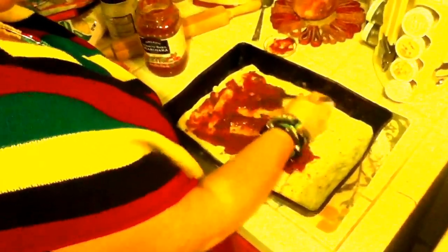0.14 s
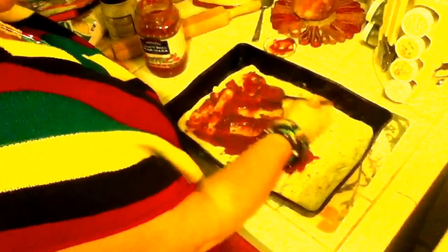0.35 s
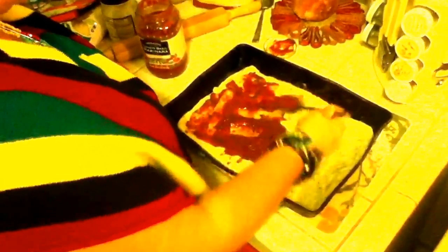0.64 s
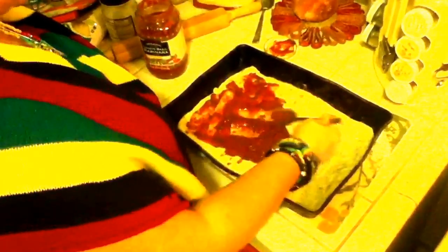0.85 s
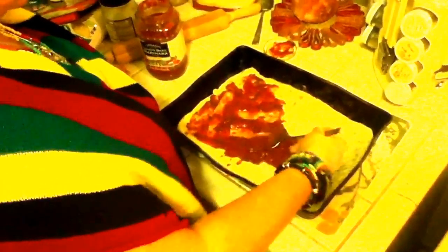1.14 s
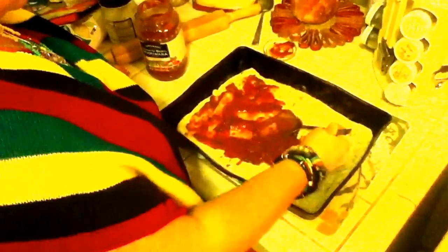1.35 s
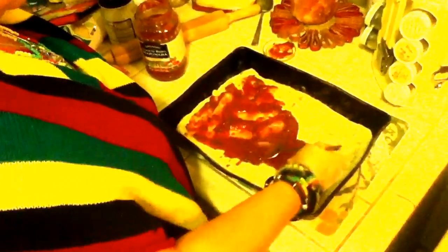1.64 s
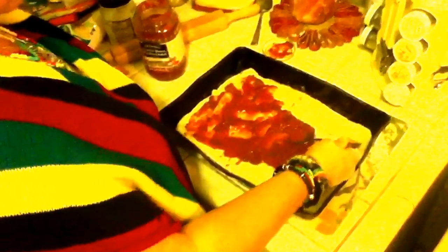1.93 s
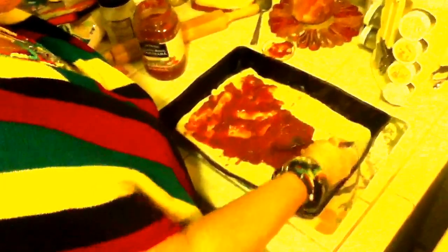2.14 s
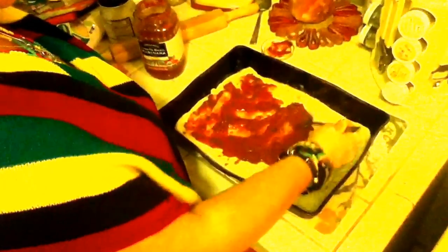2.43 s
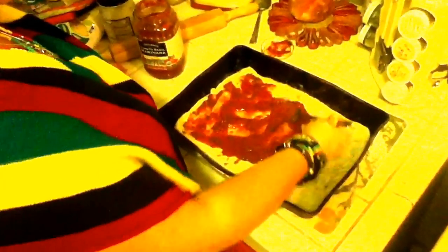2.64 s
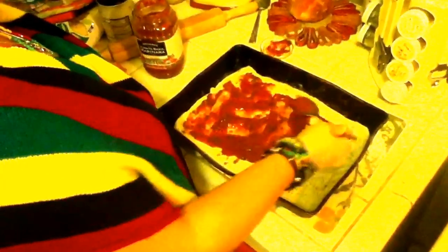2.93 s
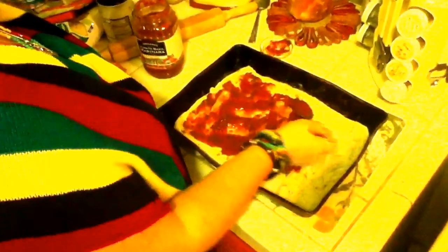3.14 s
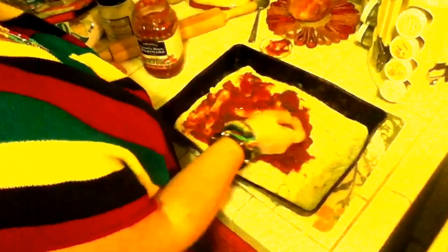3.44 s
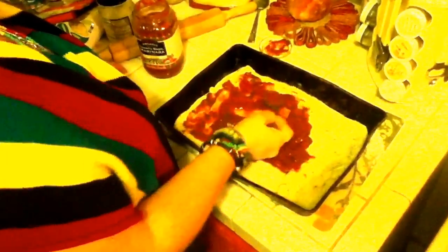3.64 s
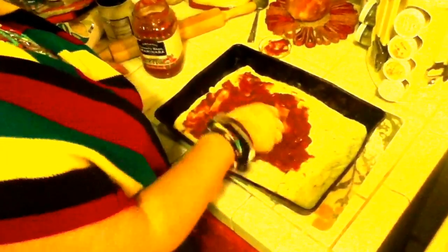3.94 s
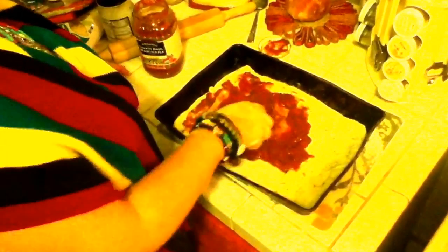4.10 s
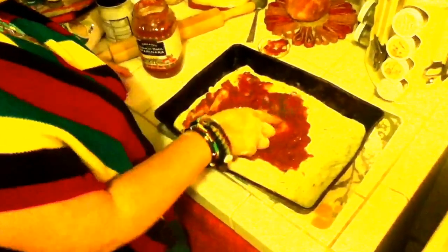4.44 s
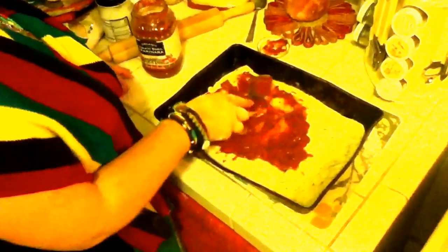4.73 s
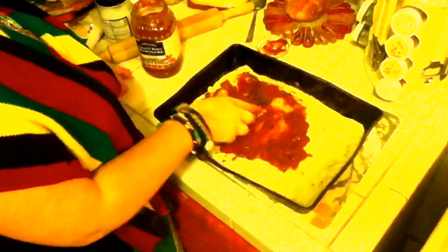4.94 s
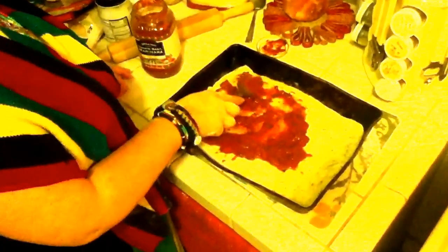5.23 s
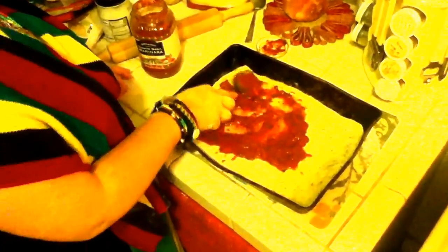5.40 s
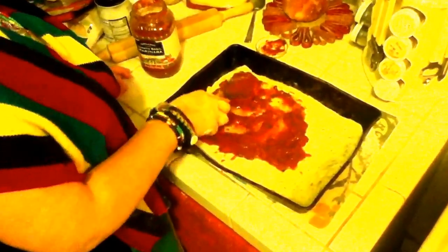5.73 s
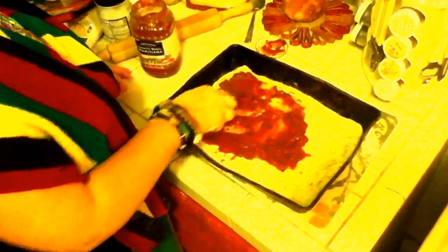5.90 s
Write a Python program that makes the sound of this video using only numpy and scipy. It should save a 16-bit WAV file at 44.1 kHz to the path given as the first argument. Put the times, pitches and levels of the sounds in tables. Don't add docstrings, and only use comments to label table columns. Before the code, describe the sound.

A thin baking pan moves on rough tile, heard close in a small reflective kitchen. It barely scrapes at first, beads clicking lightly, then lands hard several times, ringing and rattling for about half a second. Only hiss and low refrigerator hum follow. Later it is pushed with soft thuds and a short drag, knocked again more weakly, and ends with short swelling scrapes and light knocks as the hum drops away.

```python
import sys
import numpy as np
from scipy import signal
from scipy.fft import rfft, irfft, next_fast_len
from scipy.io import wavfile
from scipy.ndimage import map_coordinates

SR = 44100
rng = np.random.default_rng(int(sys.argv[2]) if len(sys.argv) > 2 else 0)


def convert_level_to_amplitude(level_db):
    exponent = np.asarray(level_db, float) / 20
    return 10 ** exponent


def transcribe(signal):
    frames = np.atleast_2d(signal).T
    limited = np.clip(frames, -1, 1)
    pcm = np.round(limited * 32767).astype(np.int16)
    wavfile.write(sys.argv[1], SR, pcm)


N = 267246
SPAN = SR * 2 // 5


def unit(x):
    return x / np.sqrt(np.mean(x ** 2) + 1e-20)


def along(points, hz):
    f, v = np.transpose(points)
    return np.interp(np.log(hz + 1), np.log(f + 1), v)


def coloured(x, gain_db):
    m = next_fast_len(len(x) + 4096)
    gain = convert_level_to_amplitude(gain_db(np.fft.rfftfreq(m, 1 / SR)))
    cepstrum = irfft(np.log(gain + 1e-6), m)
    cepstrum[1:m // 2] *= 2
    cepstrum[m // 2 + 1:] = 0
    return irfft(rfft(x, m) * np.exp(rfft(cepstrum)), m)[:len(x)]


def wobble(count, rate):
    return map_coordinates(rng.standard_normal(400), [np.arange(count) * rate / SR % 390])


def kitchen():
    # (frequency [Hz], density [dB per Hz])
    air_curve = [(12, -64), (20, -22), (113, -5), (187, -8.5), (222, -5.5), (248, -9), (357, -13.5),
                 (574, -18), (825, -20.5), (897, -21.5), (1530, -25), (2600, -25.5), (8890, -28.5),
                 (14700, -32), (16000, -46)]
    # (frequency [Hz], level [dB])
    whines = [(223, -71.5), (822, -76), (8651, -77), (14993, -81)]
    t = np.arange(N) / SR
    air = convert_level_to_amplitude(-52.5) * unit(coloured(rng.standard_normal(N), lambda hz: along(air_curve, hz)))

    idle_db, load_db, sway_db, hum_hz = -81.5, -57.5, 1.2, 118
    hum_db = np.interp(t, [1.0, 1.9, 4.73, 5.1], [idle_db, load_db, load_db, idle_db])
    hum_db = hum_db + sway_db * wobble(N, rate=1.47)
    hum = convert_level_to_amplitude(hum_db) * np.sin(2 * np.pi * hum_hz * t)

    drift = np.cumsum(rng.standard_normal(N)) * 0.0027
    whine = sum(convert_level_to_amplitude(db + 4.5) * np.sin(2 * np.pi * hz * t + drift) for hz, db in whines)
    return air + hum + whine


def add(track, s, sound):
    track[round(s * SR):][:len(sound)] += sound


def sheet_modes(damping):
    # (frequency [Hz], width [Hz], level [dB])
    sheet = [(348, 33, -12), (528, 14, -3), (563.6, 8.3, 0), (694, 4.7, -10.5), (766, 9.2, -6),
             (815, 56, -4.5), (967, 39, -0.5), (1113, 34, -3.5), (1233, 12, 9), (1235, 7.7, -3.5),
             (1271, 60, 1), (1390, 13, 9), (1378, 9.3, 1), (1425, 8.6, 6.5), (1692, 21, -4), (1734, 11, -4),
             (1818, 12, 4), (2070, 41, -7), (2170, 21, 2), (2314, 99, 2.5), (2423, 78, 2), (2850, 27, -3),
             (3020, 28, -1.5), (3070, 120, -24), (3370, 24, -8), (3830, 46, -11), (4000, 26, -19),
             (4440, 17, -11), (4510, 49, -9), (6170, 55, -6)]
    t = np.arange(SPAN) / SR
    hz, width, db = np.transpose(sheet)[:, :, None]
    width = damping * np.clip(width, 13, 80)
    return convert_level_to_amplitude(db) * width * np.exp(-np.pi * width * t) * np.sin(2 * np.pi * hz * t)


def ring(bank, scatter_db):
    luck = rng.standard_normal((2, len(bank)))
    return unit((np.sign(luck[1]) * convert_level_to_amplitude(scatter_db * luck[0])) @ bank)


def tail(onset, tilt_db=0):
    # (frequency [Hz], time to fall 60 dB [s])
    fade = [(300, 0.24), (800, 0.41), (2000, 0.28), (3500, 0.27), (6000, 0.26), (12000, 0.15)]
    hz, t, z = signal.stft(rng.standard_normal(SPAN), SR, nperseg=128)
    start_db = tilt_db * np.log2(np.clip(hz, 1000, 6000) / 1000)
    decay_db = start_db[:, None] - 60 * t / along(fade, hz)[:, None]
    dying = signal.istft(z * convert_level_to_amplitude(decay_db), SR, nperseg=128)[1][:SPAN]
    return dying * (1 - np.exp(-np.arange(SPAN) / SR / onset))


def kicks(count):
    sizes = convert_level_to_amplitude(4 * np.minimum(rng.exponential(size=count // 64 + 1), 3))
    return unit(rng.standard_normal(count) * sizes.repeat(64)[:count])


def lift(hz, centre_hz, db):
    return db * np.exp(-(np.log((hz + 1) / centre_hz) / .13) ** 2)


def stroke(t, length, start_db, swell_db, attack_share):
    edge_db, release_s = 24, .03
    tremor_db, tremor_rate = 1.5, 30
    end_db = start_db + swell_db
    knots = np.cumsum([0, attack_share * length, length, release_s])
    db = np.interp(t, knots, [start_db - edge_db, start_db, end_db, end_db - edge_db], -120, -120)
    return convert_level_to_amplitude(db + tremor_db * wobble(len(t), tremor_rate))


def slides():
    # (start [s], length [s], drone [dB], drone swell over the stroke [dB], grit [dB])
    drags = [
        (.79, .075, -54.5, 1, -53.5),
        (1.87, 0.082, -34.5, 1.5, -44.5),
        (3.77, 0.14, -39, -0.5, -47),
        (4.11, .25, -67, 2, -57.5),
        (4.531, .23, -35.5, -17.5, -49),
        (5.149, 0.1, -51.5, 2.5, -57.5),
        (5.43, 0.1586, -49, 5, -55.5),
    ]
    # (drone [Hz], lift [dB], grit [Hz], lift [dB])
    grips = [(715, 12, 3340, 10), (1240, 14, 4250, 9), (830, 1.5, 3300, 10), (2000, 18, 3440, 16),
             (1240, -3.5, 5900, 2.5), (1100, 11, 2460, 8), (1040, 8.5, 2300, 5)]
    # (frequency [Hz], density [dB per Hz])
    drone_curve = [(180, -32.5), (300, -22), (393, -13.5), (525, -10.5), (707, -10), (825, -6), (1210, -5),
                   (1570, -8), (3000, -26.5), (3900, -45), (6600, -120)]
    # (frequency [Hz], density [dB per Hz])
    grit_curve = [(1200, -34), (2200, -5), (2800, -6), (3400, -15), (4200, -9.5), (5300, -11.5),
                  (6200, -17), (7300, -11), (9000, -15.5), (13000, -24), (16000, -42)]
    mode_curve = [(500, 14.5), (1500, 5.5), (3500, -10.0)]
    attack_share, grit_fade_db = .17, 5

    track, t = np.zeros(N + SR), np.arange(SR * 4 // 5) / SR
    count = len(t)
    bank = sheet_modes(damping=1.5)
    for drag, grip in zip(drags, grips):
        s, length, drone_db, swell_db, grit_db = drag
        drone_hz, drone_lift_db, grit_hz, grit_lift_db = grip
        drive = stroke(t, length, drone_db, swell_db, attack_share)
        grit = stroke(t, length, grit_db + grit_fade_db / 2, -grit_fade_db, attack_share)

        def held(hz):
            return lift(hz, drone_hz, drone_lift_db)

        modes = coloured(ring(bank, scatter_db=5), lambda hz: held(hz) + along(mode_curve, hz))
        droning = signal.fftconvolve(drive * kicks(count), modes / np.linalg.norm(modes))[:count]
        rumble = drive * unit(coloured(kicks(count), lambda hz: along(drone_curve, hz) + held(hz)))
        rasp = coloured(kicks(count), lambda hz: along(grit_curve, hz) + lift(hz, grit_hz, grit_lift_db))
        rasp = grit * unit(rasp)
        echo = tail(onset=0.0014)
        answer = signal.fftconvolve(rumble + rasp, echo / np.linalg.norm(echo))[:count]
        sound = convert_level_to_amplitude(-7) * droning + convert_level_to_amplitude(-16) * rumble + convert_level_to_amplitude(-9) * rasp + convert_level_to_amplitude(-7) * answer
        add(track, s - attack_share * length, sound)
    return track[:N]


def contacts():
    # (time [s], peak [dB], brightness [dB], tail [dB])
    nudges = [
        (0.797, -50, -10, 2),
        (3.745, -38, -13, 2),
        (3.788, -37, -18, 12),
        (3.846, -38, -15, -13),
        (3.88, -30.5, -26, 14),
        (4.296, -52, -5, -12),
    ]
    # (time [s], peak [dB],
    # brightness [dB], upper middle [dB], tail [dB])
    blows = [(1.796, -7, -8, -2.5, -6), (1.949, -19.5, -12, -2.5, -7), (2.101, -12, -7, -3, -0.5),
             (2.106, -16, -13.5, -9, -14), (2.189, -14.5, -15.5, -5, -7.5), (2.275, -21.5, -17, -6, -5.5),
             (4.504, -14.5, -8, 0, -9.5), (4.584, -29, -29, -10, -8), (4.598, -27.5, -35, -7.5, -12),
             (4.647, -35, -34, -5, -6), (5.044, -24, -13.5, 2, -10.5), (5.087, -32, -2, -1.5, -4.5),
             (5.586, -27.5, -45, -17, -12)]
    # (time [s], peak [dB], brightness [dB])
    rocks = [(1.912, -28.5, -32), (1.926, -26, -21.5), (1.936, -24, -13), (1.944, -24.5, -17),
             (2.201, -23.5, -12), (2.281, -27.5, -9), (3.901, -32, -19.5), (4.661, -40.5, 3),
             (4.791, -35.5, -33), (5.059, -31.5, -18), (5.168, -45, -15), (5.194, -36, -45),
             (5.21, -38, -37), (5.226, -47, -40), (5.49, -40.5, -19), (5.601, -41.5, -25)]
    soft = [(s, db, bright_db, 0.5, tail_db) for s, db, bright_db, tail_db in nudges]
    soft += [(s, db, bright_db, -14, -0.5) for s, db, bright_db in rocks]
    hard = [(s, db, bright_db, -18, tail_db, mid_db) for s, db, bright_db, mid_db, tail_db in blows]
    leads = [(s - .003, db - 29, *rest) for s, db, *rest in hard[:3:2]]
    return hard + leads + [(*row, 8 + 0.83 * row[2]) for row in soft]


def knocks():
    # (frequency [Hz], density [dB per Hz])
    blow_curve = [(120, -42), (200, -9.5), (430, -18.5), (554, -14), (665, -13.5), (798, -8.5), (890, -10),
                  (1260, -9), (1590, -7.5), (2090, -1.5), (3550, -9), (6020, -19), (15500, -41)]
    track, t = np.zeros(N + SPAN), np.arange(SPAN) / SR
    bank = sheet_modes(damping=.8) * (1 - np.exp(-t / .0012))
    for s, db, treble_db, bass_db, tail_db, mid_db in contacts():
        burst = rng.standard_normal(SPAN) * (1 - np.exp(-t / 0.00015)) * np.exp(-t / 0.0035)
        burst = np.diff(burst, prepend=0) * 0.67 + 0.89 * burst
        tilt_db = max(0.16 * (db + 12), -0.5)
        dense = burst + convert_level_to_amplitude(tail_db - 5) * tail(onset=0.0018, tilt_db=tilt_db)
        dense = coloured(dense, lambda hz: along(blow_curve, hz))
        body = unit(dense) + convert_level_to_amplitude(.3 * tail_db - .5) * ring(bank, scatter_db=2.2)

        hard_db = treble_db + 7.5
        top_db = 2.2 * hard_db - 1
        shelves = [(600, bass_db + 11), (950, 0), (1550, 0), (2100, mid_db), (2900, mid_db),
                   (3900, hard_db), (4900, hard_db), (6000, top_db), (9000, top_db), (13000, top_db - 6)]
        sound = coloured(body, lambda hz: along(shelves, hz))
        add(track, s, convert_level_to_amplitude(db - 7.5) * sound / sound[:SR // 100].std())
    return track[:N]


def beads():
    # (time [s], peak [dB], pitch [Hz], tail [dB])
    clicks = [
        (0.846, -46, 8860, -9.5),
        (1.2204, -34.5, 10600, -10),
        (1.239, -49, 9440, -10),
        (5.0865, -26.5, 8600, -9),
    ]
    track, t = np.zeros(N + SPAN), np.arange(SPAN) / SR
    for s, db, hz, tail_db in clicks:
        click = rng.standard_normal(SPAN) * np.exp(-((t - .0008) / 0.0003) ** 2)
        click = click + convert_level_to_amplitude(tail_db - 8) * tail(onset=0.001)
        shape = [(.3 * hz, -36), (.6 * hz, -20), (.8 * hz, -7), (hz, 0), (1.15 * hz, -6), (1.6 * hz, -13)]
        sound = coloured(click, lambda f: along(shape, f))
        add(track, s - .0006, convert_level_to_amplitude(db + 6) * sound / np.abs(sound).max())
    return track[:N]


def scene():
    return (kitchen() + slides() + knocks() + beads())[None]


def top_cut(x):
    return signal.sosfilt(signal.butter(12, 16430, fs=SR, output="sos"), x)


def record(dry):
    m = next_fast_len(N)
    hz = np.fft.rfftfreq(m, 1 / SR)
    bass_cut = hz ** 2 / (hz ** 2 + 16 ** 2)
    kept = irfft(rfft(dry, m) * (hz < 15790) * bass_cut, m)[:, :N]
    return top_cut(kept)


dry = scene()
out = record(dry)
transcribe(out)
```